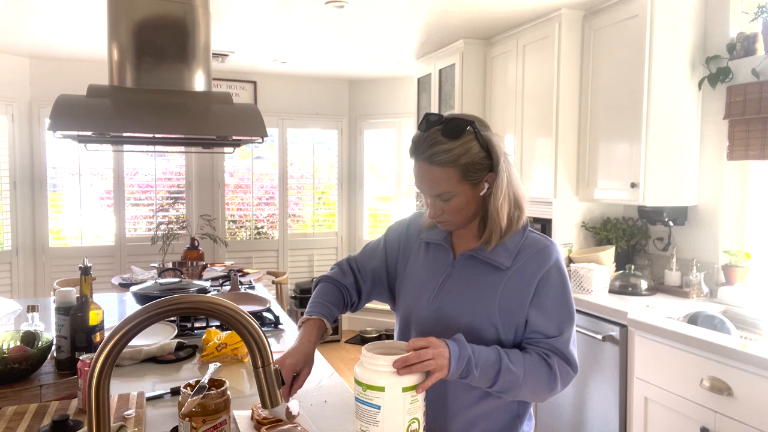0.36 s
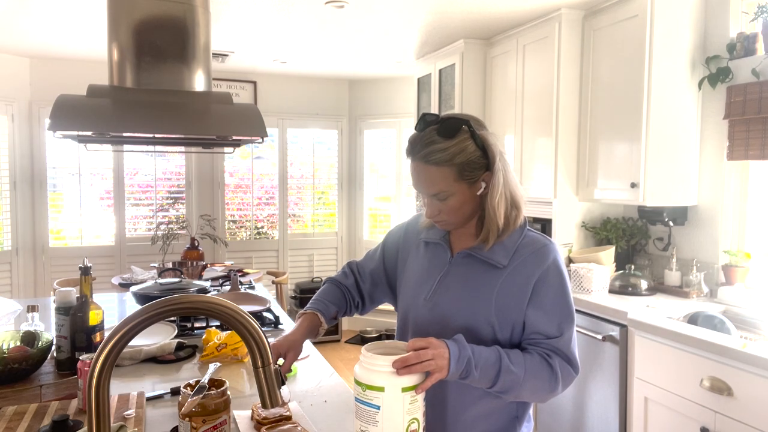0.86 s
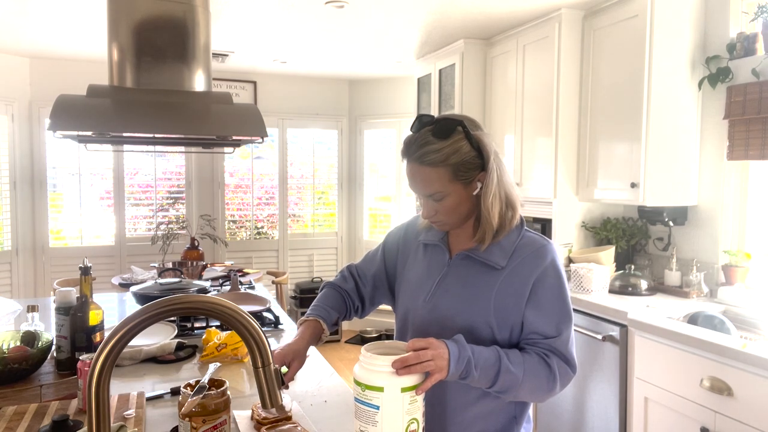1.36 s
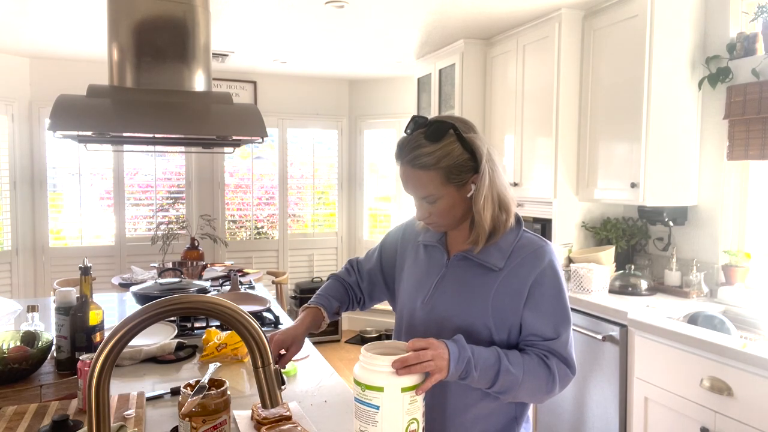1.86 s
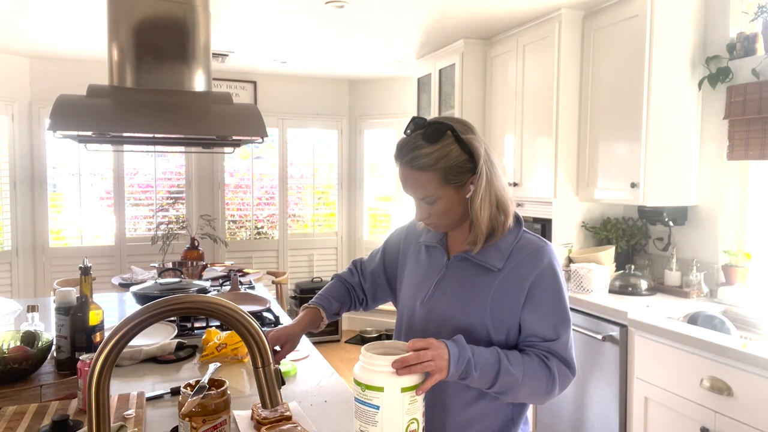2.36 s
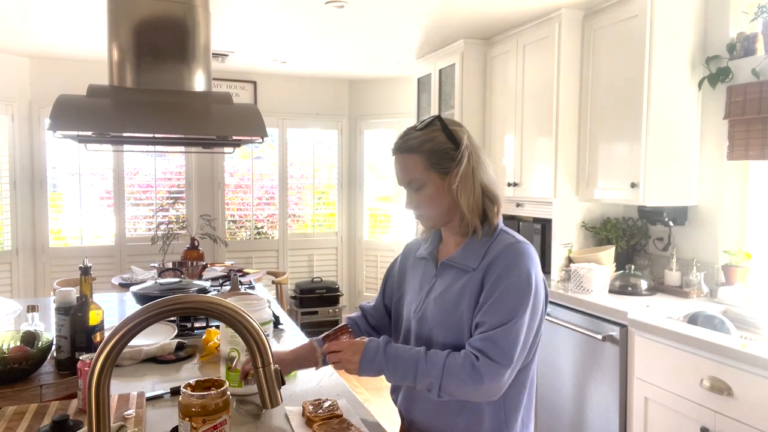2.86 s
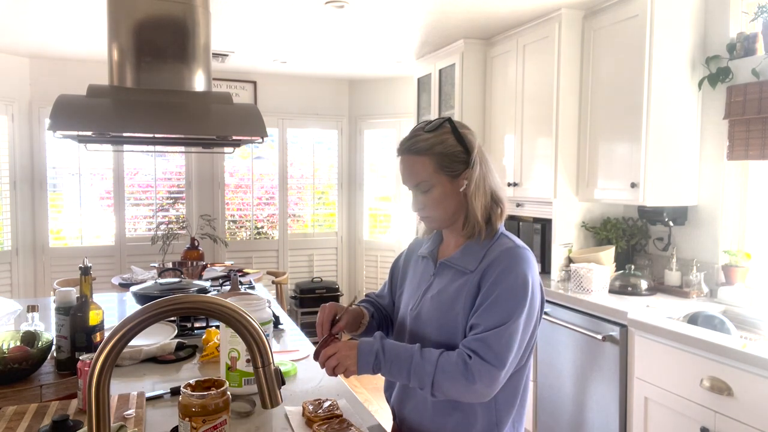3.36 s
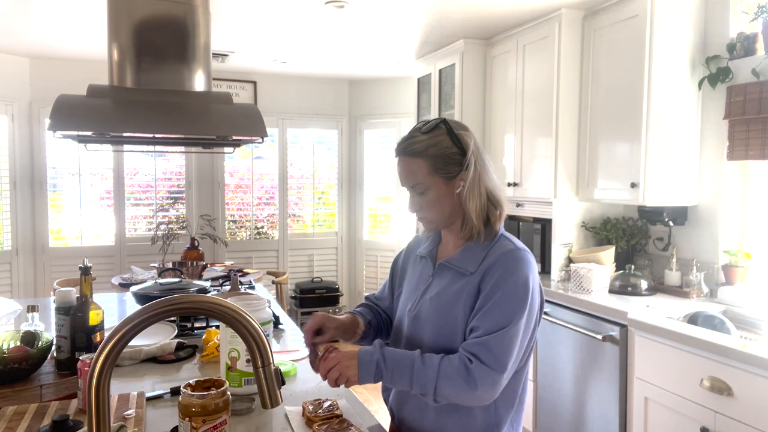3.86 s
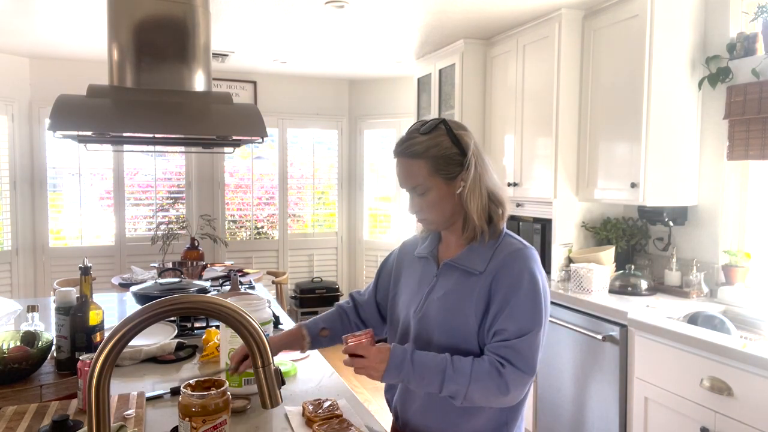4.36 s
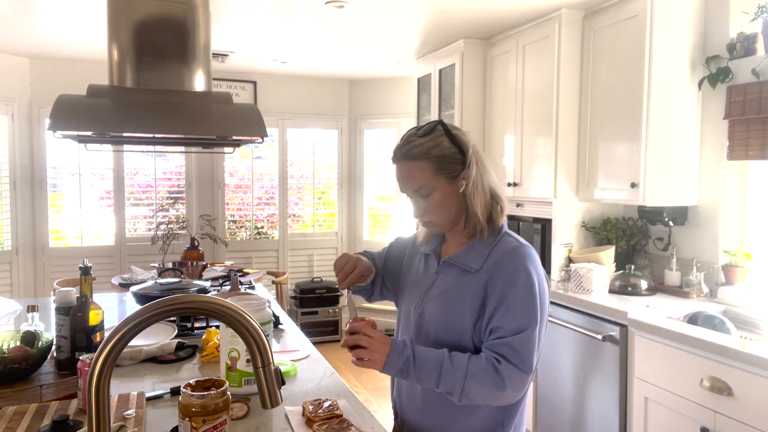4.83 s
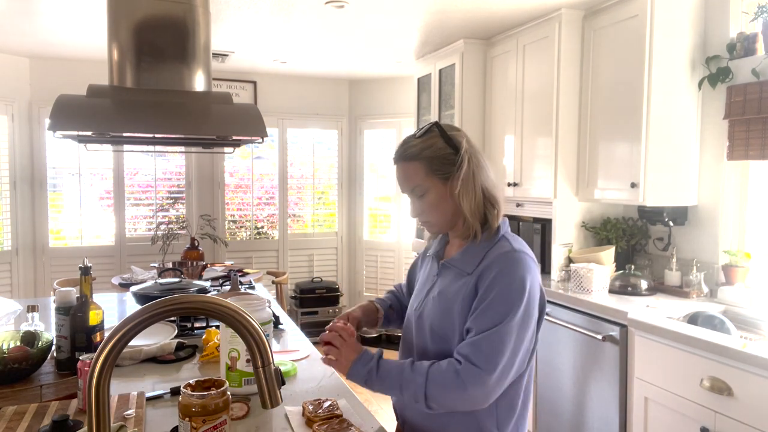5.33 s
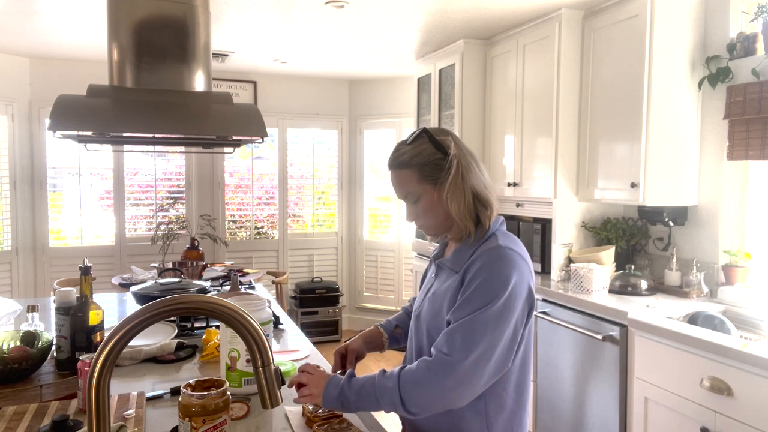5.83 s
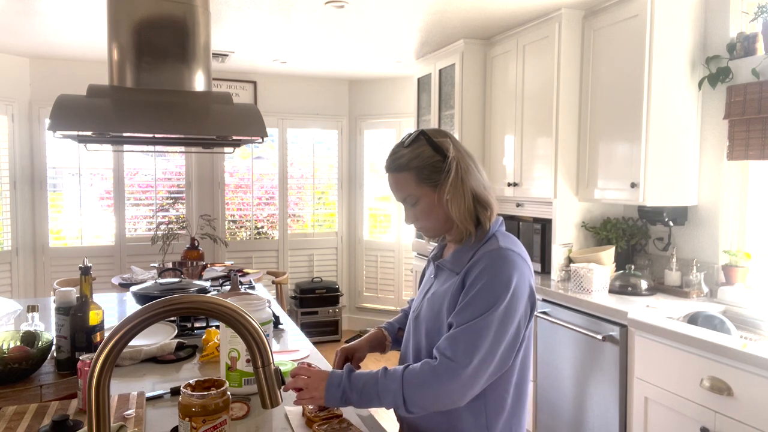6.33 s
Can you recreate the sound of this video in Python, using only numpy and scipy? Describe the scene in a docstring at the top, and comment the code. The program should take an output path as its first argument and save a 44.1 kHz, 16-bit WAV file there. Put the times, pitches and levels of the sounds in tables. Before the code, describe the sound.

Stereo microphones a few metres off in a lively, hard-surfaced kitchen. Almost nothing but low hum for over two seconds, with soft blade rubs near the threshold. A knife or spoon clatters loudly, followed by delicate metallic handling, a soft counter bump, a rapid hollow jar rattle, and a short plate knock with high glass clinks. Short echoes follow, then near silence.

```python
"""Cutlery clatters and rattles in a hard-walled kitchen: each contact is a set of dying modes and a noise crack.
A jar, a plate and a small glass are knocked the same way, and something bumps softly on the counter.
A knife spreads food: rubs are filtered grit or narrow hiss, squeaks are wavering tones with an octave.
An appliance hums in wavering tones over a room tone of random spectra.
Two spaced microphones, a few metres off; sparse decaying echoes give the room."""
import sys
import numpy as np
from scipy import signal
from scipy.fft import rfft, irfft, next_fast_len
from scipy.io import wavfile
from scipy.ndimage import uniform_filter1d

SR = 44100
rng = np.random.default_rng(int(sys.argv[2]) if len(sys.argv) > 2 else 0)


def to_wav(s):
    """Save 16-bit WAV."""
    ch = np.atleast_2d(s).T  # columns
    pcm = np.round(np.clip(ch, -1, 1) * 32767)  # PCM
    wavfile.write(sys.argv[1], SR, pcm.astype(np.int16))


def makeup_ratio(level_db):
    """Linear amplitude ratio for a level in decibels (20 dB per factor of ten)."""
    decades = np.asarray(level_db, float) / 20
    return 10 ** decades


N = 284974  # samples

# Room tone spectrum, relative: [f/Hz, level/dB per Hz]
AIR_SPECTRUM = [(25, -30.5), (45, -8), (70, 0.5), (200, -1), (330, -1), (500, -7.5), (800, -12.5),
                (1000, -21), (1600, -28.5), (3000, -33), (5000, -38), (8000, -34), (10300, -32.5),
                (11200, -62)]
# Likeness of left and right in room tone and echoes: [f/Hz, correlation -1 to 1]
LEFT_RIGHT_LIKENESS = [(60, -0.25), (180, 0.35), (550, 0.052), (1650, -0.086), (4970, 0.38), (15000, -0.21)]
# Echo decay time in the kitchen, before the extra late fade: [f/Hz, t60/s]
KITCHEN_T60 = [(250, 0.36), (900, 0.76), (2800, 0.79), (4600, 0.82), (9000, 0.38), (14000, 0.17)]
# Overall tone of the finished sound, with a bass dip below 45 Hz and a deep notch near 12 kHz: [f/Hz, level/dB]
OVERALL_TONE = [(20, -20), (45, 2.5), (80, 2), (9500, 1.5), (10500, -6.5), (11300, -19.5),
                (12300, -35), (13200, -10), (15300, -6.5), (16500, -58)]
# Appliance tones: [f/Hz, width/Hz, level/dB rms, steady part against the wavering part]
HUM_TONES = [(60.2, 5, -59.5, 2.2), (116.2, 7.1, -67.5, .8), (272.6, 9, -68.5, 1.7), (359.3, 6, -67.5, 1.9),
             (646, 5.8, -69, 2.4)]
# Soft bumps on the counter: [t/s, level/dB, settled f/Hz, t60/s]
BUMPS = [(3.818, -30.5, 103.4, 0.036)]
# Soft rubbing of blade, bread and sleeve: [start t/s, rise t/s, hold t/s, level/dB, brightness 0-1]
RUB_STROKES = [(0.0, 0.0025, .09, -75, 0.41), (0.681, 0.015, .03, -65.5, 0.01),
               (0.847, 0.029, .09, -83, .4), (1.704, 0.019, .09, -77.5, 0.1), (2.479, 0.019, .07, -71.5, 1),
               (4.672, 0.056, .11, -68.5, .85), (5.479, .05, .04, -68.5, 0.69),
               (6.024, .08, .03, -86, 0.43)]
# Dull and bright ends of the rubbing colour: [f/Hz, level/dB]
DULL_RUB_COLOUR = [(500, -10), (1000, -1), (1500, -2.5), (2100, 4), (2700, -4.5), (3100, -10),
                   (4500, -18.5), (7000, -17), (11000, -22.5)]
BRIGHT_RUB_COLOUR = [(500, -23.5), (1000, -11), (2000, -10.5), (4000, -3.5), (6000, -5), (8000, -5),
                     (11000, -8)]
# Rubs that sing in one band: [start t/s, length t/s, f/Hz, width/Hz, level/dB]
SINGING_RUBS = [(0.0, 0.11, 3850, 520, -84), (0.0, 0.22, 6260, 900, -87.5), (0.707, 0.059, 6700, 595, -90),
                (0.836, 0.15, 1883, 402, -81.5), (1.726, 0.11, 2102, 200, -83),
                (2.164, 0.057, 4000, 700, -87)]
# Thin squeaks: [start t/s, length t/s, starting f/Hz, level/dB, octave level/dB, breathy width/Hz]
SQUEAK_TONES = [(0.984, 0.32, 3068, -81.5, -2, 35), (1.257, 0.24, 1973, -82.5, -13, 160)]

# Modes of each thing: [f/Hz, width/Hz, struck level/dB, rubbed level/dB (cutlery and jar only)]
GLASS_MODES = [(1640, 200, -21.5), (2966, 43, -3.5), (3059, 70, -2), (3275, 160, -11.5), (3760, 770, -7.5),
               (5130, 200, -17), (7910, 81, -3), (8240, 160, -7), (9030, 200, -17)]
PLATE_MODES = [(811, 150, -7.5), (1090, 13, -16), (1290, 50, -8.5), (1669, 77, -0.5), (1753, 39, -1),
               (2106, 77, -18.5), (2470, 24, -20), (4700, 200, -39), (7570, 93, -12), (7750, 250, -13.5)]
JAR_MODES = [(949, 23, -8.5, -18), (950, 19, -4.5, -19), (1253, 28, -11, -11), (2510, 54, -9, -13.5),
             (3150, 170, -8.5, -11), (3820, 36, -8, -9.5), (4070, 50, -14.5, -16.5), (5100, 80, -12, -13),
             (6566, 110, -8, -9.5), (8770, 240, -9.5, -14.5), (10330, 100, -19.5, -12.5)]
CUTLERY_MODES = [(1826.4, 20, -7.5, -13.5), (2795, 51, -6, -1.5), (3329, 20, -20, -2),
                 (3667, 40, -7.5, -11), (4180, 150, -17.5, -5.5), (4955, 50, -11.5, -6.5),
                 (5530, 52, -8, -12.5), (6060, 340, 1, -10.5), (6756, 76, -3, -4.5), (6880, 150, -4, -2.5),
                 (8540, 140, -5.5, -8), (8100, 150, -7, -14), (9005, 160, -9, -13), (10060, 140, 0, -14)]
# Colour of the broad crack under the modes: [f/Hz, level/dB]
GLASS_CRACK_COLOUR = [(300, -22), (1000, 5), (3000, -2.5), (5500, -5.5), (8000, 1), (11000, -19),
                      (16000, -3.5)]
PLATE_CRACK_COLOUR = [(300, -22.5), (800, -4), (1700, 3), (3000, -6), (5500, -30), (8000, -20.5),
                      (16000, -11.5)]
JAR_CRACK_COLOUR = [(300, -11.5), (900, -22), (2000, 2.5), (4000, -1), (7000, -5.5), (10000, 11.5),
                    (16000, -8)]
CUTLERY_CRACK_COLOUR = [(300, -13.5), (800, -9.5), (2000, -9), (4000, -4), (6800, -8), (9000, -3),
                        (12000, -6.5), (16000, -5)]
# Clear blows: [t/s, peak level/dB, tilt/dB per octave before limiting (glass and cutlery only)]
GLASS_HITS = [(4.8772, -23, -4.5), (4.8866, -17, -1.5), (5.008, -20.5, 0), (5.035, -34, -6),
              (5.085, -21.5, 0.5), (5.221, -35.5, 1), (5.7694, -39, 2)]
PLATE_HITS = [(4.892, -12), (4.898, -24.5)]
JAR_HITS = [(4.228, -11.5), (4.244, -16), (4.249, -13), (4.265, -11), (4.282, -16.5), (4.298, -26),
            (4.338, -32.5), (4.377, -22)]
CUTLERY_HITS = [(0.9924, -50.5, 6), (2.6273, -38, -2), (2.742, -32.5, -7.5), (2.7488, 1, 3.5),
                (2.7804, -26, 0.5), (2.7862, -20.5, -5.5), (2.8, -4.5, 9.5), (2.8104, -20.5, -7.5),
                (2.8267, -11, 2), (2.8411, -15.5, 2.5), (2.9891, -24, 2.5), (3.1332, -31, -0.5),
                (3.1503, -27.5, 0.7), (3.2614, -23, 1), (3.2912, -19.5, 4), (3.347, -41, 4.5),
                (3.4114, -51.5, -1), (3.432, -27.5, 10), (3.5435, -31.5, 1), (3.5692, -44, -1.5),
                (3.6722, -31, 12.5), (3.8221, -28, 7.3), (3.866, -30, -4), (3.9661, -31.5, 0),
                (4.0395, -37, 0), (4.0611, -21, 1), (4.1492, -30, 6)]
# Spells of chatter while handled: [start t/s, rise t/s, hold t/s, level/dB, fade/dB per s]
GLASS_SPELLS = [(4.9, .09, .04, -48, 200), (5.131, 0.052, .07, -50.5, 195),
                (5.77, 0.012, 0.054, -63.5, 200)]
JAR_SPELLS = [(4.23, 0.08, 0.061, -37.5, 136.2)]
CUTLERY_SPELLS = [(2.625, 0.0019, .01, -56, 95), (2.744, 0.0047, .005, -35, 333),
                  (2.878, 0.097, 0.022, -48.5, 146), (3.104, 0.13, 0.93, -52, 179)]


def read(points, hz):
    """Interpolates a table along log frequency."""
    f, value = np.transpose(points)
    return np.interp(np.log(hz + 1), np.log(f + 1), value)


def evened(x):
    """Scales to an rms of one."""
    return x / np.sqrt(np.mean(x ** 2) + 1e-20)


def smooth_noise(shape, samples):
    """Slow random wandering: white noise under a running mean, with an rms of one."""
    return evened(uniform_filter1d(rng.standard_normal(shape), samples))


def coloured(x, points):
    """Filters a sound by a dB spectrum."""
    size = next_fast_len(x.shape[-1], True)
    gain = makeup_ratio(read(points, np.fft.rfftfreq(size, 1 / SR)))
    return irfft(rfft(x, size) * gain, size)[..., :x.shape[-1]]


def add(mix, s, sound):
    """Lays a sound in at time s."""
    part = mix[round(s * SR):][:len(sound)]
    part += sound[:len(part)]


def spell(t, start, rise, hold, peak_db, fade_db_per_s):
    """Gain of a gesture: silence, a swell through 17 dB, a hold, then a steady fade."""
    swell_db = 17 * np.clip(1 - (t - start) / rise, 0, 1)
    fade_db = fade_db_per_s * np.maximum(t - start - rise - hold, 0)
    return (t >= start) * makeup_ratio(peak_db - swell_db - fade_db)


def wavering_tone(hz, width):
    """A slowly wandering complex strength of the given bandwidth, and the running phase of the curve hz."""
    r = np.exp(-np.pi * width * 64 / SR)
    coarse = np.arange(0, len(hz) + 64, 64)
    slow = signal.lfilter([1], [1, -r], rng.standard_normal((len(coarse), 2)) @ [1, 1j])
    slow /= np.sqrt(np.mean(abs(slow) ** 2))
    return np.interp(np.arange(len(hz)), coarse, slow), np.cumsum(hz) * 2 * np.pi / SR


def decorrelated(left, other, hz):
    """A left-right pair with the tabled likeness in each band, from two independent spectra."""
    same = np.clip(read(LEFT_RIGHT_LIKENESS, hz), -1, 1)[:, None]
    return np.array([left, same * left + np.sqrt(1 - same ** 2) * other])


def air():
    """Room tone: random short-time spectra, varied by faint patches smooth in time and frequency."""
    frames, hz = N // 512 + 5, np.fft.rfftfreq(2048, 1 / SR)
    a, b, c, d, patches = rng.standard_normal((frames, 1025, 5)).T
    patches_db = -1.0 * evened(uniform_filter1d(uniform_filter1d(patches, 20, 0), 8, 1))
    z = decorrelated(a + 1j * b, c + 1j * d, hz)
    z *= makeup_ratio(read(AIR_SPECTRUM, hz)[:, None] + patches_db)
    tone = signal.istft(z, nperseg=2048, noverlap=1536)[1][:, :N]
    return makeup_ratio(-63.5) * evened(tone)


def hum():
    """Appliance tones wavering in strength, offset in phase between the microphones; the highest one sinks."""
    out = np.zeros((2, N))
    for hz, width, db, steady in HUM_TONES:
        slow, phase = wavering_tone(np.full(N, hz), width)
        if hz == HUM_TONES[-1][0]:
            # from 2.4 s the level sinks 5.5 dB at an even pace over 4 s
            db = db - 5.5 * np.clip((np.arange(N) / SR - 2.4) / 4, 0, 1)
        offset = np.array([[0], [hz / 300]])  # radians
        out += makeup_ratio(db) * evened(np.real((steady + slow) * np.exp(1j * (phase + offset))))
    return out


def kitchen(x):
    """Sparse echoes of random sign off hard walls, each band dying at its own speed, ever faster later on."""
    taps = np.zeros((2, 32000))
    at = np.arange(200, 31980, 20) + rng.integers(0, 20, (2, 1589))
    np.put_along_axis(taps, at, rng.choice([-1., 1.], at.shape), 1)
    hz, t, z = signal.stft(taps, SR, nperseg=256)
    z = decorrelated(z[0], z[1], hz)
    z *= np.minimum(0.61 + t / 0.012, 1)  # the echoes build up over the first walls
    late_fade_db = 219.5 * t ** 2
    z *= makeup_ratio(-60 * t / read(KITCHEN_T60, hz)[:, None] - late_fade_db)
    tail = signal.istft(z, SR, nperseg=256)[1]
    return signal.fftconvolve(x[None], tail / np.linalg.norm(tail[0]), axes=1)[:, :N]


def placed(x, delay, wet_db, left_db=1.2):
    """Spaced pair: the left microphone hears the direct sound delay samples later; echoes are added to both."""
    direct = np.array([makeup_ratio(left_db) * np.roll(x, delay), x])
    return direct + makeup_ratio(wet_db) * kitchen(x)


def thud():
    """A low push that starts high and settles as it dies, and a faint pop whose pitch slides upward."""
    t, out = np.arange(8000) / SR, np.zeros(N)
    pop_hz, rise_per_s = 620, 38
    for s, db, hz, t60 in BUMPS:
        push = np.sin(2 * np.pi * hz * (t + 0.0041 * (1 - np.exp(-t / 0.0036))))
        pop = np.sin(2 * np.pi * pop_hz * np.expm1(rise_per_s * t) / rise_per_s)
        pop *= np.sin(np.pi * np.minimum(t / .021, 1))  # one 21 ms arch
        add(out, s, makeup_ratio(db) * (makeup_ratio(-60 * t / t60) * push + makeup_ratio(-20) * pop))
    return out


def rubs():
    """Soft rubbing as fine uneven grit, each stroke somewhere between dull and bright."""
    grit = rng.standard_normal(N) * makeup_ratio(6 * smooth_noise(N, 90))
    dull = evened(coloured(grit, DULL_RUB_COLOUR))
    bright = evened(coloured(grit, BRIGHT_RUB_COLOUR))
    t, out = np.arange(N) / SR, np.zeros(N)
    for *stroke, share in RUB_STROKES:
        share = np.clip(share, 0, 1)
        out += spell(t, *stroke, fade_db_per_s=133) * ((1 - share) * dull + share * bright)
    return out


def singing_rubs():
    """Resonant rubbing: narrow-band hiss that swells and dies as one arch."""
    out = np.zeros(N)
    for start, length, hz, width, db in SINGING_RUBS:
        t = np.arange(0, length, 1 / SR)
        r = np.exp(-np.pi * width / SR)
        slow = signal.lfilter([1], [1, -2 * r, r * r], rng.standard_normal((SR, 2)) @ [1, 1j])[:len(t)]
        hiss = evened(np.real(slow * np.exp(2j * np.pi * hz * t)))
        add(out, start, makeup_ratio(db) * np.sqrt(np.sin(np.pi * t / length)) * hiss)
    return out


def squeaks():
    """Unsteady stick-slip tones with their octaves, sagging in pitch throughout."""
    out = np.zeros(N)
    for start, length, hz, db, octave_db, width in SQUEAK_TONES:
        t = np.arange(0, length, 1 / SR)
        slow, phase = wavering_tone(hz * (1 - 0.086 * t), width)
        # the swell tops out 36 % of the way through, 12.5 dB above either end
        level_db = db + np.interp(t / length, [0, 0.36, 1], [-12.5, 0, -12.5])
        tone = np.exp(1j * phase) + makeup_ratio(octave_db) * np.exp(2j * phase)
        add(out, start, makeup_ratio(level_db) * np.real(slow * tone))
    return out


def ring(modes, crack, crack_db, crack_s, tilt_db, spread_db, column):
    """Contacts, one a row: dying modes weighted and detuned by grip and spot, and a short crack; peaks of one."""
    hz, width, db = np.transpose(modes)[[0, 1, column], :, None]
    t, count = np.arange(4096) / SR, len(tilt_db)
    spot, grip = rng.standard_normal((count, len(hz), 2, 1)).transpose(2, 0, 1, 3)
    dying = makeup_ratio(db + spread_db * spot) * np.sqrt(width) * np.exp(-np.pi * width * t)
    tones = (dying * np.sin(2 * np.pi * hz * (1 + .002 * grip) * t)).sum(1)
    noise = evened(coloured(rng.standard_normal((count, len(t))), crack)) * np.exp(-t / crack_s)
    sound = tones / abs(tones).max(1, keepdims=True) + makeup_ratio(crack_db) * noise
    sound *= np.minimum(t / .0005, 1)  # half a millisecond of onset
    octaves = np.log2(np.clip(np.fft.rfftfreq(len(t), 1 / SR), 1500, 12000) / 4000)
    tilt = makeup_ratio(np.outer(np.clip(tilt_db, -6, 6), octaves))
    sound = irfft(rfft(sound) * tilt)
    return sound / abs(sound).max(1, keepdims=True)


def knocks(modes, crack, hits, crack_db, crack_s):
    """The clear blows on one thing, each ringing its struck modes."""
    out = np.zeros(N)
    at, peak_db, *tilt_db = np.transpose(hits)
    tilt_db = tilt_db[0] if tilt_db else np.zeros(len(at))
    contacts = ring(modes, crack, crack_db, crack_s, tilt_db, spread_db=1.5, column=2)
    for s, db, sound in zip(at, peak_db, contacts):
        add(out, s, makeup_ratio(db) * sound)
    return out


def chatter(modes, crack, spells, crack_db, crack_s, per_s, uneven_db, dull_db):
    """Random small contacts in spells of handling; per_s is their rate before they bunch into bursts."""
    out, length = np.zeros(N), 2 * SR
    t = spells[0][0] + np.arange(length) / SR
    when, size = rng.random((2, 10, length))
    clumps = makeup_ratio(4.3 * smooth_noise(length, 900))  # contacts come in bursts
    ticks = (when < clumps * per_s / 10 / SR) * makeup_ratio(uneven_db * np.minimum(-np.log(size + 1e-9), 4))
    ticks = ticks * makeup_ratio(4 * smooth_noise((10, length), 5000))  # the touched spot wanders
    # ten kinds of contact, ringing the rubbed modes where these are listed, under a stronger crack
    contacts = ring(modes, crack, crack_db + 3.5, crack_s, np.full(10, dull_db), spread_db=5, column=-1)
    sound = signal.fftconvolve(ticks, contacts, axes=1).sum(0)
    add(out, t[0], evened(sound[:length]) * sum(spell(t, *row) for row in spells))
    return out


def plate():
    """A knocked plate: broad, quickly damped modes with a very short crack."""
    return knocks(PLATE_MODES, PLATE_CRACK_COLOUR, PLATE_HITS, crack_db=-8, crack_s=0.0018)


def glass():
    """A small knocked glass: high modes, then a sparse chatter of fairly even contacts."""
    body = GLASS_MODES, GLASS_CRACK_COLOUR
    crack = dict(crack_db=-11.5, crack_s=.003)
    return (knocks(*body, GLASS_HITS, **crack)
            + chatter(*body, GLASS_SPELLS, **crack, per_s=500, uneven_db=1.5, dull_db=-1.0))


def jar():
    """A knocked jar: modes from about 950 Hz up, a strong crack, and a dense dull chatter."""
    body = JAR_MODES, JAR_CRACK_COLOUR
    crack = dict(crack_db=-0.5, crack_s=0.0037)
    return (knocks(*body, JAR_HITS, **crack)
            + chatter(*body, JAR_SPELLS, **crack, per_s=2000, uneven_db=5.5, dull_db=-3.2))


def cutlery():
    """Clattering cutlery: many bright metal modes struck in turn, and a rattle of uneven contacts."""
    body = CUTLERY_MODES, CUTLERY_CRACK_COLOUR
    crack = dict(crack_db=-8.5, crack_s=0.0027)
    return (knocks(*body, CUTLERY_HITS, **crack)
            + chatter(*body, CUTLERY_SPELLS, **crack, per_s=830, uneven_db=5.5, dull_db=-2.0))


def scene():
    """All sources in their places before the microphone pair."""
    mix = air() + hum()
    mix += placed(thud(), delay=3, wet_db=-2.0)
    mix += placed(rubs() + squeaks() + singing_rubs(), delay=7, wet_db=2)
    mix += placed(plate() + glass(), delay=4, wet_db=-3)
    mix += placed(jar(), delay=7, wet_db=-3.0, left_db=1.25)
    mix += placed(cutlery(), delay=7, wet_db=-2.5, left_db=1.25)
    return mix


def roll_off(x):
    """The treble ends steeply here."""
    return signal.sosfilt(signal.butter(12, 16470, fs=SR, output="sos"), x)


def record(dry):
    """An overall tone, notched near 12 kHz, colours the whole mix."""
    mix = coloured(dry, OVERALL_TONE)
    return roll_off(mix)


dry = scene()
out = record(dry)
to_wav(out)
```